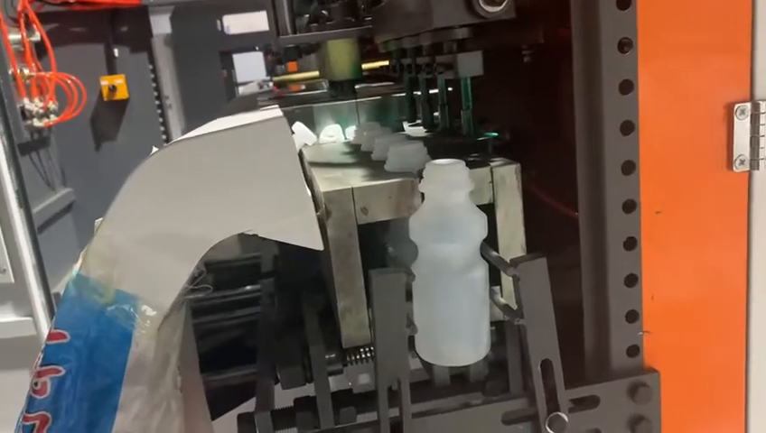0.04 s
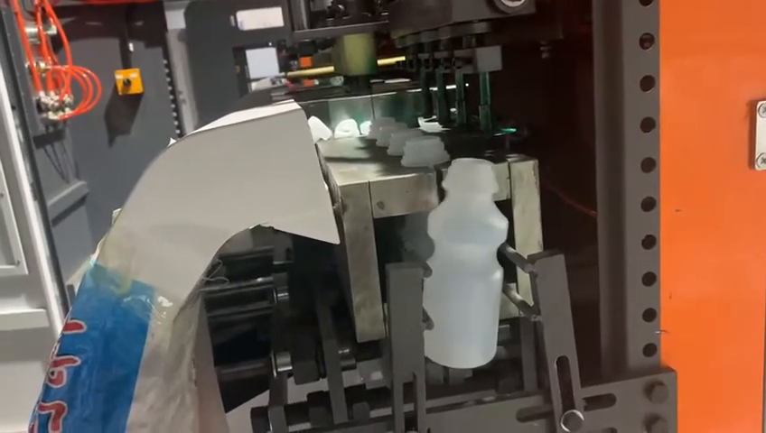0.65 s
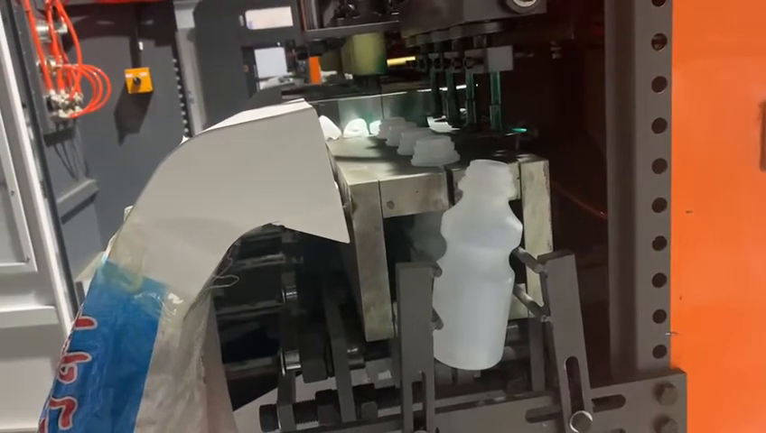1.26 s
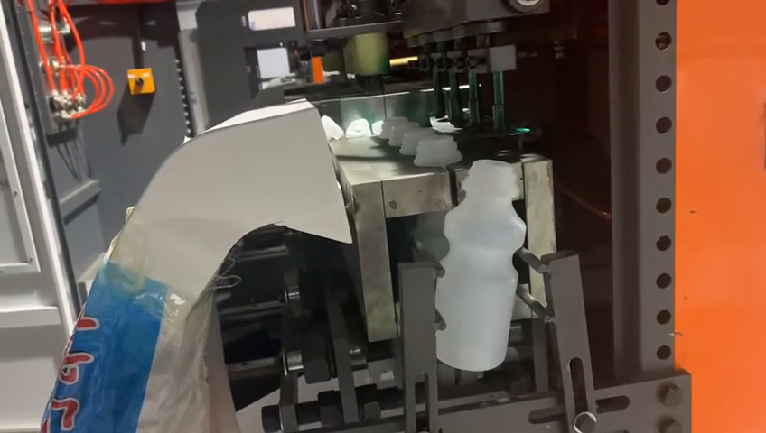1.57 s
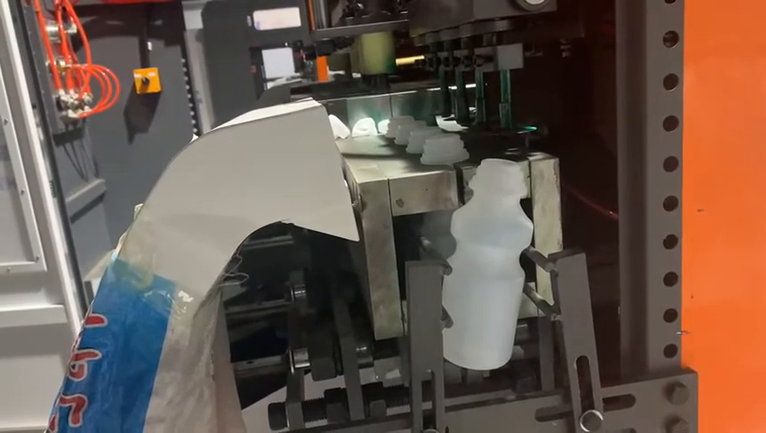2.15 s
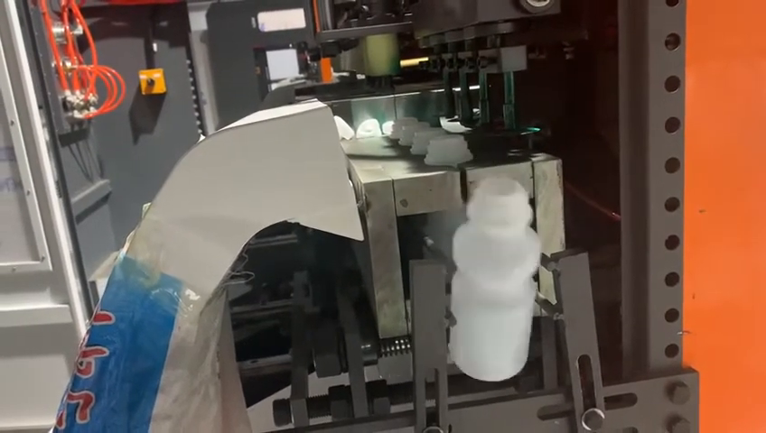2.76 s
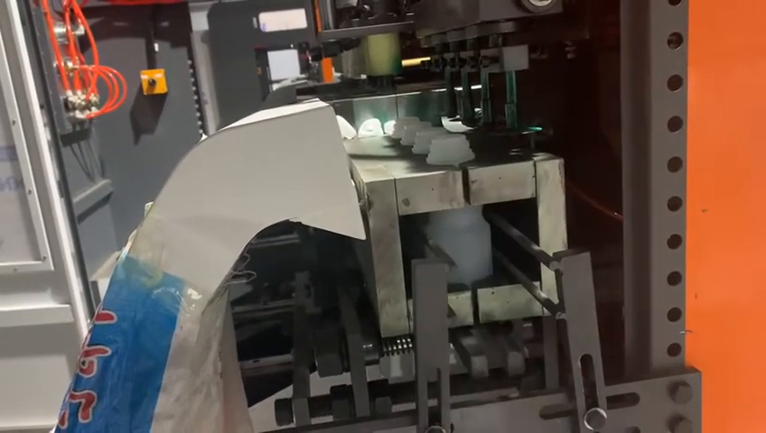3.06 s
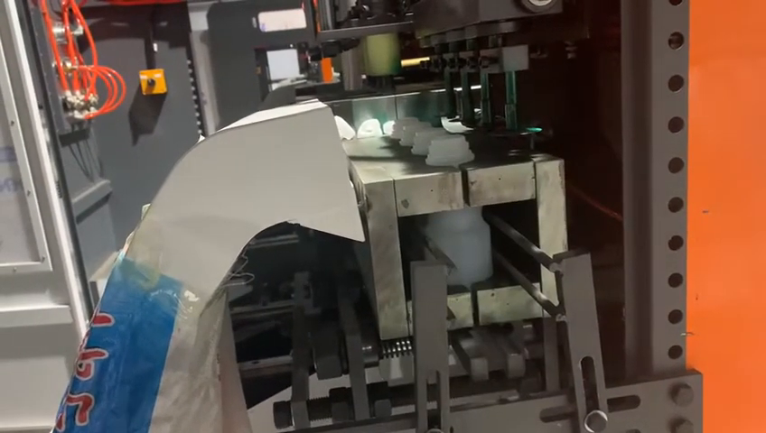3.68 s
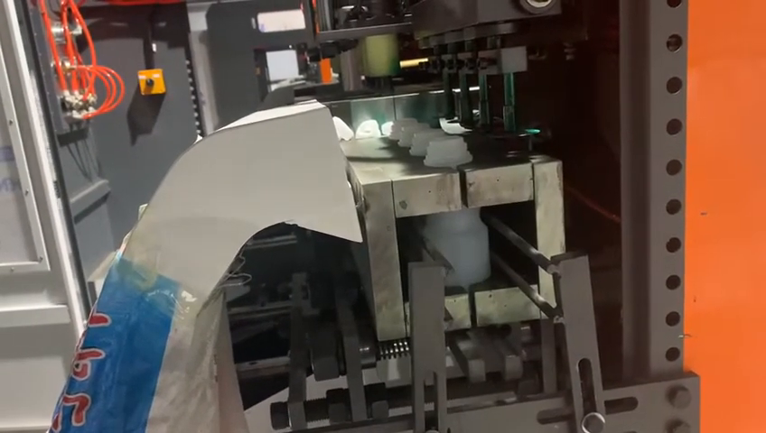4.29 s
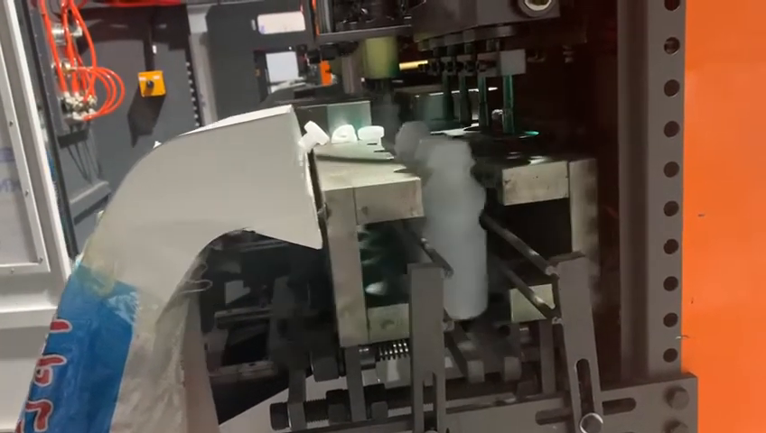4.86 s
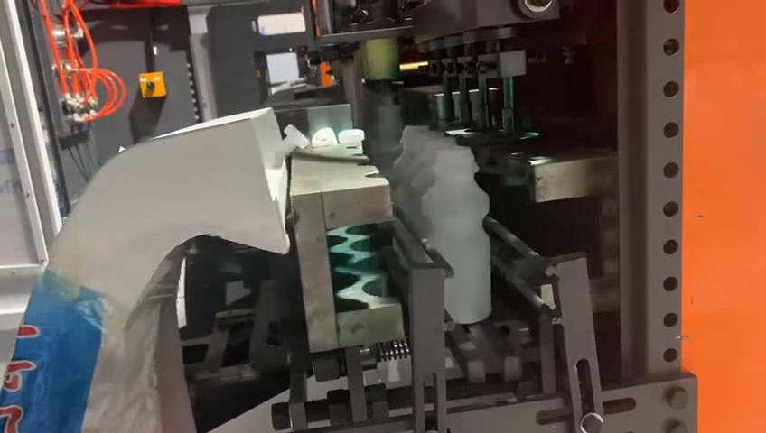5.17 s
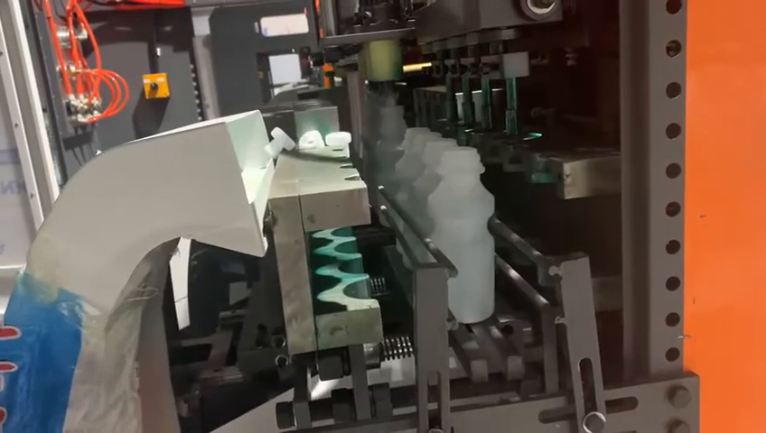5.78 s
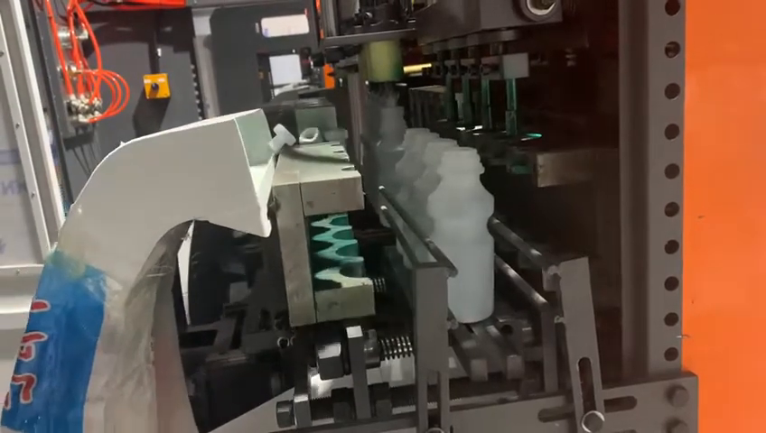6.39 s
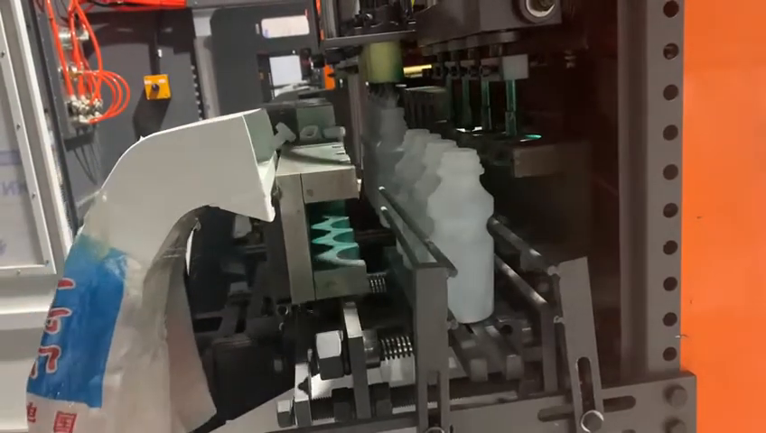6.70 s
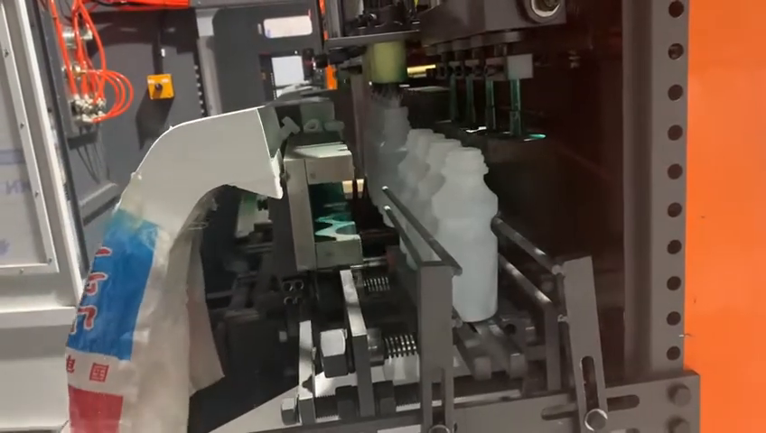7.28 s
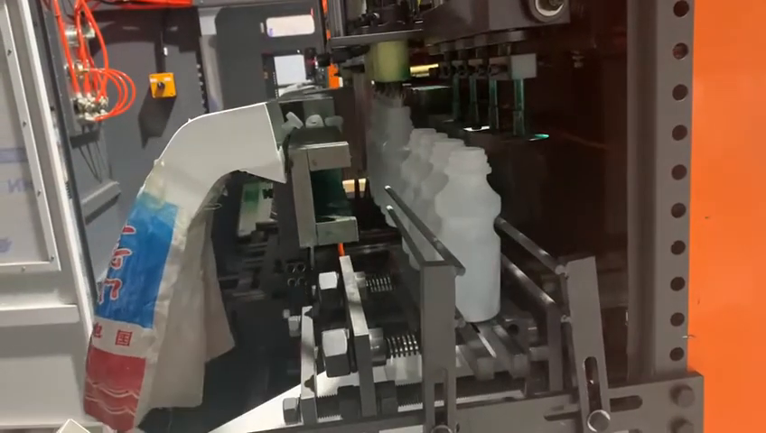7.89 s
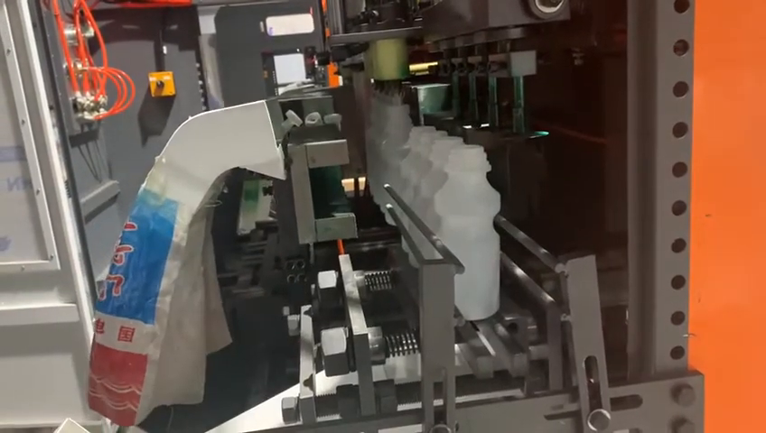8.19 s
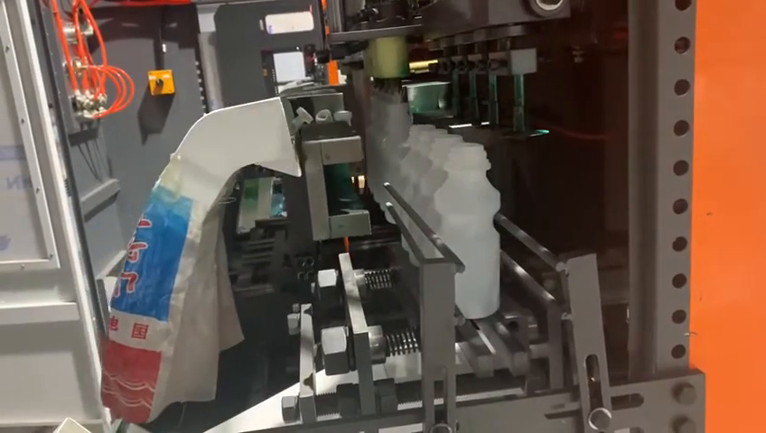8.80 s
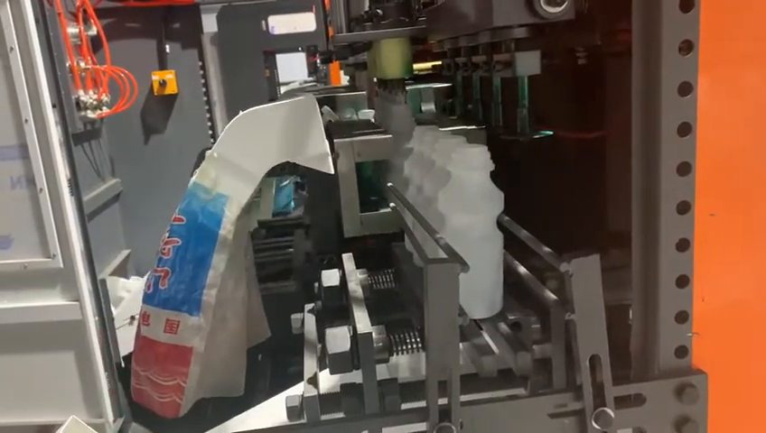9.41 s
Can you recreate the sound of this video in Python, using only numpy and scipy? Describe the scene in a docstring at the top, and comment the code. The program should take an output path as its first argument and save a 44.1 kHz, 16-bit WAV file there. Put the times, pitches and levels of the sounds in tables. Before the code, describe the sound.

Over the steady throb and whine of factory machinery, heard from close up, a mould slams shut with a loud bang. Short blasts of compressed air alternate with metal clacks, thuds and the hollow taps of plastic bottles. Around the middle, sliding parts squeal, then air hisses strongly for a few seconds with more blasts on top. A few light knocks and a quieter hiss close the cycle.

```python
"""A bottle blow moulding machine runs through one cycle, heard close by in a factory hall.
The mould bangs shut and ducks a limiter. Bottles, carriage and latches clatter; dry slides squeal.
Valves dump air in short blasts and the blow pins hiss for seconds.
Underneath, motors throb, hydraulic pumps whine and a motor drive sings its switching tones."""
import sys
import numpy as np
from scipy import signal
from scipy.fft import rfft, irfft, next_fast_len
from scipy.io import wavfile
from scipy.ndimage import uniform_filter1d, minimum_filter1d

SR = 44100
rng = np.random.default_rng(int(sys.argv[2]) if len(sys.argv) > 2 else 0)


def dump(signal):
    """Clip the signal to [-1, 1] and save it as 16-bit WAV at the path in sys.argv[1]."""
    limited = np.clip(np.atleast_2d(signal).T, -1, 1)
    pcm = np.round(limited * 32767).astype(np.int16)
    wavfile.write(sys.argv[1], SR, pcm)


N = 425565
FFT_SIZE, CUTOFF_HZ = next_fast_len(N), 15650
TIME, FREQ = np.arange(N) / SR, np.fft.rfftfreq(FFT_SIZE, 1 / SR)


def from_db(db):
    return np.exp(np.asarray(db) * (np.log(10) / 20))


def unit_rms(x):
    return x / np.sqrt(np.mean(x ** 2) + 1e-20)


def in_time(rows):
    """Each column of a curve at every sample."""
    times_s, *columns = np.transpose(rows)
    return [np.interp(TIME, times_s, column) for column in columns]


def at_hz(points):
    """A curve over log frequency at every bin."""
    hz, value = np.transpose(points)
    return np.interp(np.log(FREQ + 1), np.log(hz), value)


def band(low_hz, high_hz, order=4):
    """Smooth band-pass gain at every bin."""
    return 1 / np.sqrt((1 + (low_hz / (FREQ + 1)) ** (2 * order)) * (1 + (FREQ / high_hz) ** (2 * order)))


def drift(rate_hz, size=N):
    """Bounded random wander, rms 1."""
    knots = np.clip(rng.standard_normal(int(2 * rate_hz * size / SR) + 2), -2, 2)
    return unit_rms(np.interp(TIME[:size] * 2 * rate_hz, np.arange(len(knots)), knots))


# left-right likeness: (frequency [Hz], correlation [ratio])
CORRELATION = [(60, 1), (130, 0.94), (290, 0.95), (640, 0.74), (1400, 0.31), (3100, 0.15), (5000, 0.026),
               (7000, 0.72)]

def noise(gain):
    """Coloured stereo noise, rms 1; near mono in the bass, most diffuse around 5 kHz."""
    alike = np.clip(at_hz(CORRELATION), -1, 1)
    mid, side = rfft(rng.standard_normal((2, FFT_SIZE), dtype=np.float32))
    mid, side = mid * gain * np.sqrt(1 + alike), side * gain * np.sqrt(1 - alike)
    return unit_rms(irfft(np.array([mid + side, mid - side]), FFT_SIZE)[:, :N])


def gate(rows):
    """Linear rise, hold, exponential decay; overlaps add in power."""
    power = np.zeros(N)
    for on_s, off_s, db, rise_s, decay_s in rows:
        span = slice(max(int(on_s * SR), 0), int((off_s + 10 * decay_s) * SR))
        rise = np.clip((TIME[span] - on_s) / rise_s, 0, 1)
        fall = np.exp(-np.maximum(TIME[span] - off_s, 0) / decay_s)
        power[span] += (from_db(db) * rise * fall) ** 2
    return np.sqrt(power)


def tones(partials, waver_db, waver_hz, spread_rad, jitter_rad=0.33):
    """Partials (frequency [Hz], level [dB]) wavering in level and phase, offset between channels."""
    out = 0
    for hz, db in partials:
        phase = 2 * np.pi * (hz * TIME + rng.random()) + jitter_rad * drift(waver_hz)
        level = np.sqrt(2) * from_db(db + waver_db * drift(waver_hz))
        out = out + level * np.sin(phase + [[-spread_rad / 2], [spread_rad / 2]])
    return out


def glides(rows, edge_s=0.0089):
    """Narrow, unsteady resonances sliding in pitch."""
    out = np.zeros((2, N))
    for start_s, end_s, start_hz, end_hz, db, width_hz in rows:
        size, first = max(int((end_s - start_s) * SR), 100), int(start_s * SR)
        age = TIME[:size]
        phase = 2 * np.pi * np.cumsum(np.linspace(start_hz, end_hz, size)) / SR
        swell = np.minimum(np.minimum(age, age[::-1]) / edge_s, 1)
        unsteady = drift(width_hz, size) + 1j * drift(width_hz, size)
        resonance = np.real(unsteady * np.exp(1j * (phase + [[0], [1]])))
        out[:, first:first + size] += from_db(db) * swell * resonance
    return out


# hall spectrum: (frequency [Hz], relative level [dB])
HALL_SPECTRUM = [(25, -93), (55, -69), (90, -68.5), (130, -67.5), (280, -65.5), (450, -104), (800, -68),
                 (1300, -84), (2200, -78.5), (4200, -78), (7000, -89), (11000, -82.5), (15000, -91.5)]
# air bleeding from the lines: (on [s], off [s], level [dB], rise [s], decay [s])
BLEEDS = [(-.1, .7, -39, .1, 0.45), (2.6, 3.4, -48.5, 0.51, 0.68), (4.55, 4.75, -43, 0.1, 0.18),
          (5.5, 8.3, -41.5, 0.27, 0.32)]
# carriage and linkage strokes: same columns
CARRIAGE_STROKES = [(.4, 1.5, -47, 0.073, 0.73), (2.0, 2.85, -41, 0.17, 0.16),
                    (3.25, 3.45, -42.5, 0.033, 0.22), (4.5, 5.1, -41.5, 0.054, 0.1),
                    (5.38, 5.5, -40.5, 0.035, 0.15), (6.1, 6.38, -41.5, 0.19, 0.092),
                    (6.6, 7.8, -49.5, 0.21, 0.81), (8.12, 8.75, -39, 0.044, 0.42), (9.35, 9.6, -55, .1, .1)]

def hall_noise(low_db=-47.5, high_db=-54.5, shudder_db=-0.5):
    """Steady noise; strokes shake the frame in the bass, bleeding air lifts the treble."""
    colour = from_db(at_hz(HALL_SPECTRUM))
    shudder = from_db(shudder_db) * gate(CARRIAGE_STROKES)
    low = np.hypot(from_db(low_db), shudder) * noise(colour * band(39, 198))
    high = np.hypot(from_db(high_db), gate(BLEEDS)) * noise(colour * band(870, CUTOFF_HZ))
    return low + high


# motor and pump effort, before trims: (time [s], hum [dB], whine [dB])
EFFORT = [(0, -37, -47), (1.4, -38.5, -46.5), (2.4, -39.5, -47), (3.3, -38, -46), (4.0, -39.5, -41.5),
          (4.15, -39.5, -46), (4.4, -38.5, -49), (4.6, -38, -42.5), (6.5, -35, -43), (8.3, -35, -45),
          (8.6, -33, -45), (8.85, -36, -44.5), (9.65, -33.5, -38)]
# rolling mechanism: (frequency [Hz], relative level [dB])
RUMBLE_SPECTRUM = [(90, -31), (170, -20), (230, -1), (305, 5), (450, -2.5), (800, -7.5), (1400, -11),
                   (2500, -16), (5000, -18)]

def rumble(idle_trim_db=-5, lumpy_db=1.4):
    """The mechanism idles with the motor and rolls harder on each stroke."""
    hum_db, _ = in_time(EFFORT)
    motion = np.hypot(from_db(hum_db + idle_trim_db), gate(CARRIAGE_STROKES))
    lumps = from_db(lumpy_db * drift(16))
    return motion * lumps * noise(from_db(at_hz(RUMBLE_SPECTRUM)) * band(90, 6300))


# motor partials: (frequency [Hz], relative level [dB])
MOTOR_PARTIALS = [(162.3, -1.5), (144.8, -11), (116.7, -12), (233.5, -11.5), (349, -17)]

def motor(trim_db=-2.1):
    """Close partials beat; a low note swells under load at the end."""
    hum_db, _ = in_time(EFFORT)
    hum = tones(MOTOR_PARTIALS, waver_db=1.5, waver_hz=4.6, spread_rad=0.37, jitter_rad=0.043)
    load_note = tones([(117.6, 0)], waver_db=0, waver_hz=6.6, spread_rad=.3)
    return from_db(hum_db + trim_db) * hum + gate([(9.3, 9.7, -40, .3, .1)]) * load_note


# drive switching tones: (frequency [Hz], idle [dB], loaded [dB])
SWITCHING_TONES = [(4050, -69, -70), (4170, -69, -72), (5225, -71, -71), (5883, -69, -62), (5960, -65, -55),
                   (6040, -63, -67), (6120, -62.5, -57.5), (6702, -68, -69), (12040, -68, -66)]

def inverter(idle_effort_db=-38.5, full_effort_db=-38):
    """The drive's tones shift in balance with motor load."""
    hum_db, _ = in_time(EFFORT)
    load = np.clip((hum_db - idle_effort_db) / (full_effort_db - idle_effort_db), 0, 1)
    out = 0
    for hz, idle_db, loaded_db in SWITCHING_TONES:
        tone = tones([(hz, 0)], waver_db=2, waver_hz=6, spread_rad=1.2, jitter_rad=0.4)
        out = out + from_db(idle_db + load * (loaded_db - idle_db)) * tone
    return out


# whine swells: (on [s], off [s], level [dB], rise [s], decay [s])
WHINE_SURGES = [(6.8, 7.36, -44.5, .06, .08), (7.1, 7.19, -39.5, .05, .08),
                (8.15, 8.35, -41.5, 0.028, .015), (8.49, 8.56, -36.5, .04, .03),
                (8.72, 9.1, -47.5, 0.081, 0.085)]
# second pump: (on [s], off [s], level [dB], slip [Hz])
SECOND_PUMP = [(3.28, 4.02, -44, 13.0), (4.04, 4.46, -51, 13.0), (4.52, 5.52, -43.5, 12.1)]

def pumps(whine_hz=898.5, trim_db=-4, waver_db=1.45, jitter_rad=0.16, rise_s=0.014, decay_s=0.039):
    """The main pump whines with effort; a second starts in step and slips behind, so they beat."""
    _, whine_db = in_time(EFFORT)
    level = np.hypot(from_db(whine_db + trim_db), gate(WHINE_SURGES))
    phase = 2 * np.pi * whine_hz * TIME + jitter_rad * drift(7) + [[-0.43], [0.43]]
    whine = np.sqrt(2) * from_db(waver_db * drift(7)) * np.sin(phase)
    side_note = tones([(975, -12)], waver_db=3.5, waver_hz=7.4, spread_rad=0.67)
    out = level * (whine + side_note)
    low_note = tones([(591.5, -7)], waver_db=1.5, waver_hz=6, spread_rad=0.49, jitter_rad=.15)
    for on_s, off_s, db, slip_hz in SECOND_PUMP:
        second_whine = np.sqrt(2) * np.sin(phase - 2 * np.pi * slip_hz * (TIME - on_s))
        out += gate([(on_s, off_s, db, rise_s, decay_s)]) * (second_whine + low_note)
    return out


# slide friction: (start [s], end [s], from [Hz], to [Hz], level [dB], width [Hz])
SLIDE_SQUEALS = [(4.55, 4.66, 1900, 1800, -43, 700), (4.66, 4.73, 1570, 1480, -40, 110),
                 (4.74, 4.86, 1490, 1410, -40.5, 100), (4.86, 5.02, 1530, 1440, -48, 180),
                 (4.98, 5.06, 2630, 2610, -48, 60), (5.06, 5.24, 2620, 2580, -55, 110),
                 (5.15, 5.39, 1590, 1640, -49, 120), (5.21, 5.39, 1600, 1630, -39.5, 45),
                 (6.17, 6.27, 650, 560, -44, 50), (6.25, 6.36, 530, 490, -39, 45),
                 (6.33, 6.42, 420, 390, -40, 50)]

def slides():
    """Dry slides squeal and groan."""
    return glides(SLIDE_SQUEALS)


# edges of the four contact bands: (frequency [Hz])
BAND_EDGES_HZ = [200, 600, 1500, 3800, 16000]

def knocks(hits, bands_db, rise_share=0.19, trim_db=1.5):
    """Each contact is a crash of dense, quickly damped modes; longer ones swell more slowly."""
    out, age = np.zeros((2, N)), TIME[:SR // 4]
    for k, (low_hz, high_hz) in enumerate(zip(BAND_EDGES_HZ, BAND_EDGES_HZ[1:])):
        modes = noise(band(low_hz, high_hz, order=6))
        above_middle = k - (len(bands_db) - 1) / 2
        for time_s, db, tilt_db, decay_s in hits:
            span = slice(int(time_s * SR), int(time_s * SR) + len(age))
            shape = (1 - np.exp(-age / (rise_share * decay_s))) * np.exp(-age / decay_s)
            level = from_db(db + bands_db[k] + tilt_db * above_middle + trim_db)
            out[:, span] += level * unit_rms(modes[:, span] * shape) * np.sqrt(np.mean(shape ** 2))
    return out


def part_knocks(hits, bands_db, decay_s):
    """Contacts on one part share colour and decay."""
    return knocks([(time_s, db, 0, decay_s) for time_s, db, *_ in hits], bands_db)


def struck(hits, modes, detune=0, falloff_db_per_octave=11):
    """A brief rattle rings a body; the contact point favours modes near one pitch."""
    out, age = np.zeros((2, N)), TIME[:SR // 2]
    for time_s, db, decay_s, favoured_hz in hits:
        span = slice(int(time_s * SR), int(time_s * SR) + len(age))
        rattle = rng.standard_normal(len(age)) * np.exp(-age / decay_s)
        for hz, mode_db, t60_s in modes:
            shifted_hz = hz * (1 + detune * rng.uniform(-1, 1))
            stereo_rad = rng.normal(0, 0.18 + hz / 4000, (2, 1))
            ring = np.sin(2 * np.pi * shifted_hz * age + stereo_rad) * from_db(-60 * age / t60_s)
            swing = signal.fftconvolve(rattle[None], ring, axes=1)[:, :len(age)]
            level = from_db(db + mode_db - falloff_db_per_octave * abs(np.log2(hz / favoured_hz)))
            out[:, span] += level * swing / np.abs(swing).max()
    return out


# bottles on guides: (time [s], level [dB], rattle decay [s], favoured pitch [Hz])
GUIDE_HITS = [(.85, -26, .012, 570), (.876, -22, .005, 400), (.905, -23.5, .006, 388),
              (.95, -32, .008, 370)]
# bottle body: (frequency [Hz], level [dB], t60 [s])
BOTTLE_MODES = [(290, -9, .25), (370, -5, .32), (398, -1, .26), (510, -7, .09), (619, -5, .13),
                (899, -9, .15)]

def bottle_knocks():
    """Hollow bottles knock against their guides and ring."""
    ring = struck(GUIDE_HITS, BOTTLE_MODES)
    return ring + part_knocks(GUIDE_HITS, bands_db=[-14, -14, -13.5, -20], decay_s=0.014)


# finished bottles on grippers and guides: (time [s], level [dB], pitch [Hz])
WALL_TAPS = [(2.188, -19, 805), (2.326, -29.5, 773), (2.324, -37, 1450), (2.44, -38, 1470),
             (2.493, -31.5, 1210), (2.545, -34, 810), (2.647, -32, 1150), (2.65, -35, 845),
             (3.239, -29, 1010), (3.352, -26.5, 710), (3.773, -34, 810), (3.794, -38, 1450),
             (4.495, -38, 810), (4.752, -37, 975), (8.485, -35, 1140), (8.51, -34, 550)]
# bottle wall: (frequency / pitch [ratio], level [dB], t60 [s])
WALL_MODES = [(1, 0, 0.072), (1.1, -0.5, 0.07), (0.8, -16, .03)]

def bottle_taps(contact_s=.0015):
    """Thin plastic walls ring briefly, each spot at its own pitch."""
    ring = 0
    for time_s, db, hz in WALL_TAPS:
        modes = [(hz * ratio, mode_db, t60_s) for ratio, mode_db, t60_s in WALL_MODES]
        ring = ring + struck([(time_s, db, contact_s, hz)], modes)
    return ring + part_knocks(WALL_TAPS, bands_db=[-25, -8.5, -15, -26], decay_s=0.0096)


# steel latches; near 0.85 s bottles tick sharply against their guides, and at 2.184 s the gripper grabs the
# bottles: (time [s], level [dB], decay [s], low edge # [Hz], high edge [Hz])
LATCH_SNAPS = [(.845, -24, .004, 1950, 2650), (.856, -26.5, .007, 1750, 2200),
               (.881, -28, .008, 2000, 2400), (2.1438, -10, .0016, 1650, 3450),
               (2.1438, -20, .002, 1000, 1700), (2.184, -15, .006, 750, 1150),
               (2.205, -30, .02, 1950, 2200), (3.3505, -17.5, .0023, 4050, 4700),
               (4.585, -28, .005, 1350, 2600), (4.615, -23, .005, 1300, 2450),
               (4.638, -26.5, .005, 1350, 2000), (4.853, -37, .004, 2000, 3000)]

def latches(rise_s=0.00042, ring_db=-19, ring_s=0.0078):
    """A latch snaps in a sharply bounded band of modes, then rings faintly; the bottles' sharp ticks on their
    guides sound the same way, and so does the gripper's grab on the bottles, lower down."""
    out, age = np.zeros((2, N)), TIME[:SR // 8]
    for time_s, db, decay_s, low_hz, high_hz in LATCH_SNAPS:
        span = slice(int(time_s * SR), int(time_s * SR) + len(age))
        fall = np.exp(-age / decay_s) + from_db(ring_db) * np.exp(-age / ring_s)
        shape = (1 - np.exp(-age / rise_s)) * fall
        contact = shape * (rng.standard_normal(len(age)) + .5 * rng.standard_normal((2, len(age))))
        modes = signal.sosfilt(signal.butter(6, [low_hz, high_hz], "band", fs=SR, output="sos"), contact)
        out[:, span] += from_db(db) * unit_rms(modes) * np.sqrt(np.mean(shape ** 2))
    return out


# linkage contacts: (time [s], level [dB], tilt [dB/band], decay [s])
LINKAGE_CLACKS = [(2.066, -37, -3, .018), (2.1445, -41, 9.5, 0.018), (2.184, -17.5, 3, 0.0061),
                  (2.194, -37, 1, 0.029), (2.7, -40, 3.5, 0.017), (2.775, -37, 0, 0.012),
                  (3.3506, -24, 7, 0.0035), (3.77, -33.5, 1.5, 0.0047), (3.99, -32.5, -2, 0.0033),
                  (4.108, -40, -1, .0095), (4.55, -34.5, 5, 0.063), (5.398, -40, 0, 0.02),
                  (8.329, -33, 0.5, 0.011)]
# steel contact, per band: (relative level [dB])
STEEL_DB = [-4.5, 0.5, -1.2, -1.5]

def linkages():
    """Steel linkages clack."""
    return knocks(LINKAGE_CLACKS, STEEL_DB)


def jet(rows, spectrum, flutter_db):
    """Turbulent air hiss with a slight flutter and a fine random ripple in its spectrum."""
    ripple_db = np.interp(FREQ, np.linspace(0, SR / 2, num=900), rng.standard_normal(900))
    gain = from_db(at_hz(spectrum) + ripple_db) * band(0.67 * spectrum[0][0], SR / 2, order=3)
    return gate(rows) * noise(gain) * from_db(flutter_db * drift(25))


# air releases: (open [s], close [s], level [dB], rise [s], decay [s])
VALVE_DUMPS = [(-.05, -.01, -25, .01, 0.049), (.42, .45, -20, 0.044, 0.081),
               (1.335, 1.375, -28.5, 0.026, 0.046), (2.468, 2.48, -29.5, 0.0067, 0.016),
               (4.522, 4.56, -21.5, 0.012, 0.048), (5.418, 5.465, -25, 0.0076, 0.067),
               (5.52, 5.555, -18, 0.018, 0.083), (6.53, 6.585, -19, 0.016, 0.074),
               (8.036, 8.06, -17, 0.0036, 0.051), (8.912, 8.928, -33, 0.0051, 0.045)]
CYLINDER_VENTS = [(2.815, 2.87, -31.5, 0.0099, 0.17), (2.92, 3.12, -32.5, 0.074, 0.14)]
# their spectra: (frequency [Hz], relative level [dB])
DUMP_SPECTRUM = [(700, -74), (1500, -67), (2000, -70), (2800, -63), (4200, -63), (5400, -66), (7200, -68),
                 (9000, -62), (11500, -60), (15000, -63)]
VENT_SPECTRUM = [(650, -71), (950, -66), (1250, -79), (1700, -71), (2200, -76), (2850, -70.5), (3500, -74),
                 (4300, -72), (5100, -76), (5800, -74), (7200, -79), (10000, -73), (12500, -72),
                 (15000, -80)]

def exhausts():
    """Valves dump air in blasts; a cylinder vents."""
    blasts = jet(VALVE_DUMPS, DUMP_SPECTRUM, flutter_db=0.8)
    return blasts + jet(CYLINDER_VENTS, VENT_SPECTRUM, flutter_db=1.7)


# air resonances: (start [s], end [s], from [Hz], to [Hz], level [dB], width [Hz])
PORT_GLIDES = [(.24, .36, 11000, 10900, -41, 500), (2.84, 3.04, 13000, 12600, -40, 500),
               (3.04, 3.12, 12300, 11600, -41, 450), (3.11, 3.19, 11600, 11200, -38.5, 380),
               (3.19, 3.28, 11100, 10200, -40, 400), (3.28, 3.32, 10100, 9700, -45, 400)]
PIPE_GLIDES = [(2.82, 2.9, 2620, 2720, -43, 180), (2.99, 3.15, 2900, 2820, -44.5, 260),
               (2.82, 2.92, 4250, 4150, -45, 350), (3.03, 3.18, 4350, 4280, -46.5, 350),
               (2.82, 2.95, 5850, 5790, -45, 110), (2.95, 3.14, 980, 920, -42, 220),
               (8.04, 8.13, 4250, 4230, -40, 200), (5.6, 8.05, 1420, 1440, -49, 130),
               (5.6, 8.05, 1630, 1620, -51, 90)]

def air_resonances():
    """A port whistles as pressure falls; air rings in pipes and bottle necks."""
    return glides(PORT_GLIDES) + glides(PIPE_GLIDES)


# pin airflow: (open [s], close [s], level [dB], rise [s], decay [s])
BLOWS = [(5.5, 8.07, -29, 0.22, 0.11)]
SEEPS = [(.22, .42, -51, 0.022, 0.2), (.95, 2.03, -52.5, .1, .03), (8.92, 9.7, -32, 0.15, .05)]
# its spectra and whistles: (frequency [Hz], relative level [dB])
BLOW_SPECTRUM = [(450, -67), (750, -68), (980, -66), (1150, -73), (1420, -68), (1640, -69), (1900, -74),
                 (2400, -75), (3300, -72), (4200, -74), (5300, -77.5), (7200, -76.5), (9500, -69.5),
                 (12000, -69.5), (15000, -65.5)]
SEEP_SPECTRUM = [(1300, -89), (1800, -79), (2300, -78), (2800, -84), (3400, -79), (4500, -86), (7000, -86),
                 (9500, -72), (11500, -71), (15000, -72)]
PIN_PARTIALS = [(10036, -22.5), (10118, -24), (10594, -24.5), (11128, -23), (12033, -22), (15407, -24)]

def blow_pins():
    """The pins blow air into the bottles, whistling thinly; air seeps before and after."""
    blow = jet(BLOWS, BLOW_SPECTRUM, flutter_db=0.7)
    whistles = gate(BLOWS) * tones(PIN_PARTIALS, waver_db=2, waver_hz=14, spread_rad=.5, jitter_rad=1)
    return blow + whistles + jet(SEEPS, SEEP_SPECTRUM, flutter_db=1.4)


# end-stop contacts: (time [s], level [dB], rattle decay [s], favoured pitch [Hz])
STOP_HITS = [(2.189, -22.5, 0.005, 302), (2.222, -25.5, 0.018, 230), (2.288, -29, 0.0062, 260),
             (2.358, -31.5, 0.03, 272), (2.79, -30, 0.0038, 213), (2.86, -30.5, .004, 320),
             (3.247, -22.5, 0.0094, 480), (3.29, -27, .004, 380), (3.356, -26.5, 0.0054, 420),
             (3.772, -30, 0.0055, 340), (4.494, -22.5, 0.0074, 450), (4.51, -23.5, 0.045, 280),
             (4.62, -28.5, 0.03, 300), (4.8, -29, .018, 560), (4.89, -28.5, 0.015, 320),
             (8.48, -29, 0.055, 437)]
# mould body: (frequency [Hz], level [dB], t60 [s])
MOULD_MODES = [(220, -6, 0.37), (281.8, -2, 0.25), (332.5, -2.5, 0.21), (455, -1.5, 0.1), (564, -11, 0.18),
               (795, -0.5, 0.12)]

def mould_stops():
    """Mould and carriage hit their stops; travel shifts the modes from hit to hit."""
    ring = struck(STOP_HITS, MOULD_MODES, detune=.05)
    return ring + part_knocks(STOP_HITS, bands_db=[-7.5, -9.5, -14, -13], decay_s=0.014)


# hard blows: (time [s], frequency [Hz], level [dB], decay [s])
HARD_BLOWS = [(.1294, 210, -.5, .0065), (.128, 115, -3, .007), (.1365, 64, -3.5, .018),
              (.129, 560, -4.5, .004), (.1275, 1950, -1.5, .003), (.16, 260, -16, .012),
              (.1655, 800, -5.5, .005), (.1645, 1350, -4, .005), (.1695, 1480, -1.5, .006),
              (.1697, 2850, -10, .003), (.1712, 820, -3, .004), (.183, 1650, -17, .006),
              (.186, 820, -17, .006), (8.268, 150, -23, .025), (8.595, 138, -23, .03)]

def thumps(low_cut_hz=46):
    """Each hard blow swings one mode for a few cycles."""
    out, age = np.zeros(N), TIME[:SR // 4]
    for time_s, hz, db, decay_s in HARD_BLOWS:
        first = int(time_s * SR)
        out[first:first + len(age)] += from_db(db) * np.sin(2 * np.pi * hz * age) * np.exp(-age / decay_s)
    return signal.sosfilt(signal.butter(4, low_cut_hz, "high", fs=SR, output="sos"), out)


# mould closing: (time [s], level [dB], tilt [dB/band], decay [s])
CLOSING_HITS = [(0.126, -19, 9, 0.0036), (0.124, -12.5, 8, 0.021), (0.13, -8.5, -13.5, 0.0015),
                (0.147, -18, -1.5, 0.034), (0.164, -24, -5, 0.0091), (0.183, -30, -12, .004)]

def mould_bang():
    """The mould bangs shut and rebounds."""
    return knocks(CLOSING_HITS, STEEL_DB)


def reverb(x, t60_s=0.34, predelay_s=.006):
    """Dense reflections from guards and walls."""
    age = TIME[:SR]
    echoes = noise(band(60, 6500, order=1))[:, :SR] * from_db(-60 * age / t60_s) * (age > predelay_s)
    return signal.fftconvolve(x, echoes / np.sqrt(np.sum(echoes ** 2) / 2), axes=1)[:, :N]


def scene(reverb_db=-9.5):
    """The machine in its hall, slightly right; the bang is so close that it stays dry."""
    air = exhausts() + blow_pins() + air_resonances()
    clatter = bottle_knocks() + mould_stops() + latches() + linkages() + bottle_taps()
    action = air + clatter + slides()
    bang = mould_bang() + thumps()
    reflections = from_db(reverb_db) * reverb(action)
    drives = motor() + (inverter() + pumps()) * from_db([[-1.5], [1.5]])
    return (hall_noise() + rumble() + drives + action + reflections + bang) * from_db([[-.5], [.5]])


def limiter(x, threshold_db=-13, release_db_per_s=70, attack_s=0.00051, hold_s=0.037):
    """A loud blow pushes the gain down; it holds, then climbs back."""
    level_db = 10 * np.log10(np.abs(uniform_filter1d(np.mean(x ** 2, axis=0), size=441)) + 1e-12)
    half = int(hold_s * SR / 2)
    held_db = -minimum_filter1d(np.minimum(threshold_db - level_db, 0), 2 * half + 1, origin=half)
    ramp_db = release_db_per_s * TIME
    cut_db = np.maximum.accumulate(held_db + ramp_db) - ramp_db
    pole = np.exp(-1 / (attack_s * SR))
    return x * from_db(-signal.lfilter([1 - pole], [1, -pole], cut_db))


# top-octave phase, right against left: (frequency [Hz], phase [turns])
TREBLE_PHASE = [(7000, -.7), (8500, -.5), (11150, 0), (13400, .5), (15400, .97)]

def record(dry):
    """Limiter and steep low-pass; above 8 kHz both channels carry one signal, slightly offset in time."""
    left, right = rfft(limiter(dry), FFT_SIZE)
    shared = np.clip((FREQ - 7000) / 1000, 0, 1)
    shifted_left = np.exp(2j * np.pi * at_hz(TREBLE_PHASE)) * left
    right = np.sqrt(1 - shared) * right + np.sqrt(shared) * shifted_left
    return irfft(np.array([left, right]) * band(1, CUTOFF_HZ, order=240), FFT_SIZE)[:, :N]


dry = scene()
out = record(dry)
dump(out)
```